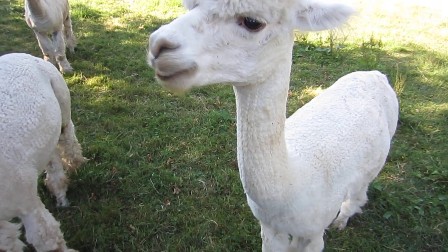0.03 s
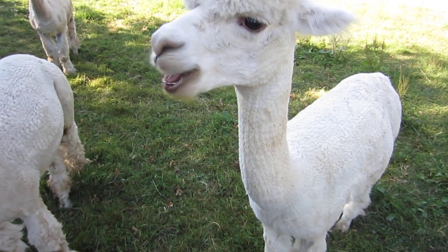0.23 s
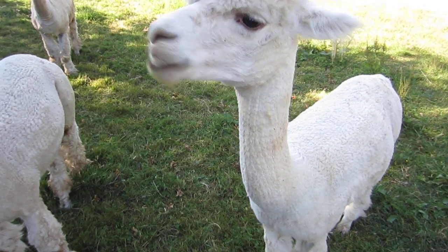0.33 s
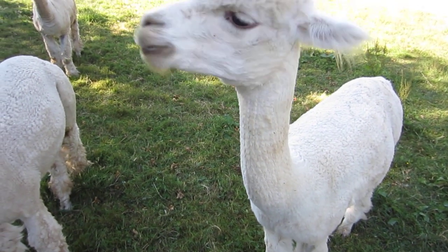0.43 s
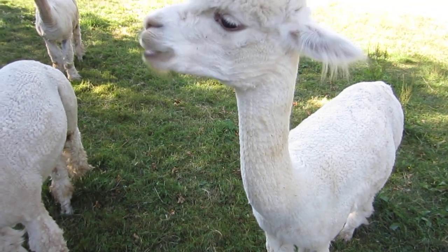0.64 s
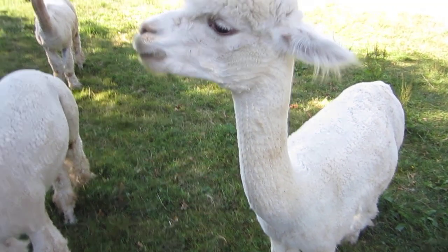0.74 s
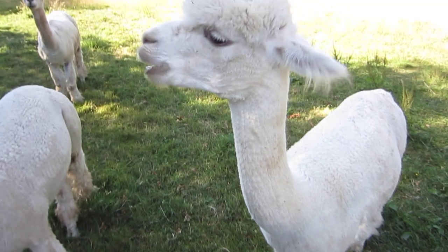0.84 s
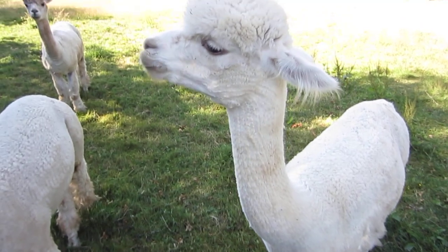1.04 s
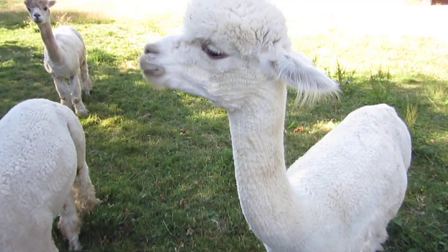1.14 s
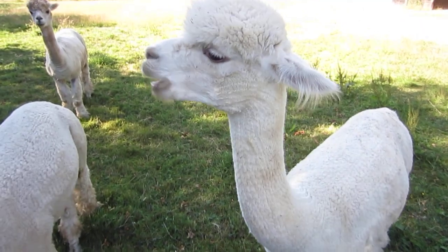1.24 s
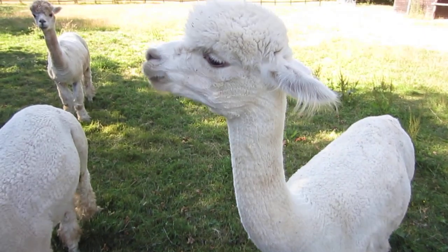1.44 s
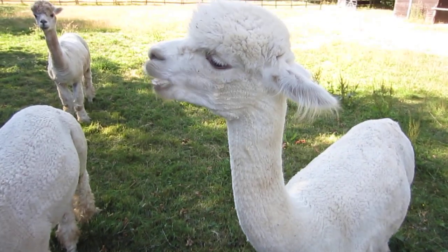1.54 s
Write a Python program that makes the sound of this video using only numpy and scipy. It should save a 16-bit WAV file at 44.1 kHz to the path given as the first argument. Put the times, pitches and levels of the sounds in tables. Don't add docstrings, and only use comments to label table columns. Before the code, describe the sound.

Light breeze thumping bare camera microphones in a grassy paddock, one violent puff, then faint hiss

```python
import sys
import numpy as np
from scipy import signal
from scipy.fft import rfft, irfft, next_fast_len
from scipy.io import wavfile
from scipy.ndimage import uniform_filter1d, map_coordinates

SR = 44100
rng = np.random.default_rng(int(sys.argv[2]) if len(sys.argv) > 2 else 0)


def to_linear_factor(level_db):
    exponent = np.asarray(level_db, float) / 20
    return 10 ** exponent


def digitize_waveform(pressure):
    field = np.atleast_2d(pressure).T
    bounded = np.clip(field, -1, 1)
    quanta = np.round(bounded * 32767).astype(np.int16)
    wavfile.write(sys.argv[1], SR, quanta)


N = 70560

# start_s (lobe centre), peak_db, pitch_hz, push +1 or suck -1
LEFT_EDDIES = [(.006, -36, 90, -1), (.11, -38, 100, 1), (.198, -17.5, 119, -1), (.2135, -16.5, 170, -1),
               (.2208, -7.5, 129.6, 1), (.2385, -18.5, 130, 1), (.2605, -15, 100, 1), (.288, -26, 120, -1),
               (.2915, -11, 140, 1), (.309, -6, 116, -1), (.2957, -21, 180, 1), (.3165, 0.5, 260, -1),
               (.3208, -11, 396, -1), (.3355, -1.5, 193, 1), (.3785, -28, 150, -1), (.3985, -9.5, 130, -1),
               (.419, -21.5, 130, -1), (.762, -23, 70, -1), (.849, -26, 130, -1), (.859, -24, 120, -1),
               (1.0, -28, 130, 1), (1.2935, -19.5, 122, 1), (1.477, -28, 100, 1)]
# start_s (lobe centre), peak_db, pitch_hz, push +1 or suck -1
RIGHT_EDDIES = [(.036, -27.5, 67.6, 1), (.2012, -10, 139, -1), (.2705, -19, 130, 1), (.2795, -7, 150, 1),
                (.283, -10.5, 150, -1), (.296, -15.5, 170, -1), (.312, 0, 90, 1), (.3147, -14.5, 420, -1),
                (.3645, -16, 130, 1), (.379, -10.5, 111, -1), (.3893, -11.5, 211, -1),
                (.425, -24.5, 82.6, -1), (.7225, -22.5, 110, -1), (.735, -22.5, 79, 1),
                (.742, -25.5, 110, -1), (.749, -21, 150, -1), (.745, -12.5, 205, 1), (.753, -17.5, 162, 1),
                (.807, -27, 109, -1), (.841, -21.5, 87, 1), (.851, -17, 86.5, -1), (.858, -22.5, 60, 1),
                (.9865, -33, 118, 1), (1.3075, -10, 159, -1), (1.339, -32, 89, 1), (1.458, -22, 99, -1)]
# start_s (lobe centre), peak_db, pitch_hz, push +1 or suck -1
PUFF = [
    (.30138, -.6, 345, 1),
    (.3023, -11, 620, -1),
    (.30285, -3.2, 225, -1),
    (.3058, -.3, 290, 1),
]
# middle_s, length_s, left_db_rms, right_db_rms
GUSTS = [(.01, 0.019, -35, -34.5), (0.053, 0.027, -49.5, -44), (0.104, 0.043, -42, -58),
         (0.164, 0.034, -61, -38.5), (.21, 0.047, -26, -27), (0.257, 0.025, -34, -39),
         (0.278, .022, -22.5, -22), (0.323, .018, -18.5, -17), (.382, 0.074, -39, -23.5),
         (0.421, 0.038, -28.5, -41), (0.509, 0.076, -46, -43.5), (0.696, .025, -44, -39),
         (0.756, 0.03, -37, -25.5), (0.804, 0.027, -48, -35), (0.862, 0.041, -33, -36.5),
         (0.9, 0.05, -36.5, -45), (0.968, 0.033, -34, -33), (0.999, 0.013, -38, -32),
         (1.059, 0.027, -50, -38), (1.256, 0.046, -41, -44), (1.308, 0.016, -28, -34),
         (1.338, 0.025, -35.5, -36), (1.459, 0.06, -38.5, -38)]
# pitch_hz, level_db_per_hz
BUFFET_SPECTRUM = [(15, -35), (30, -3), (60, 9.5), (110, 4.5), (180, -9.5), (300, -13.5), (480, -19.5),
                   (1500, -120)]
# pitch_hz, level_db_per_hz
FLUTTER_SPECTRUM = [(120, -27.5), (300, 13), (480, -12.5), (700, -8.5), (1000, -52), (2500, -120)]
# start_s, peak_db, pitch_hz, length_cycles, left_over_right_db
TICKS = [
    (.0145, -50, 6600, 8, 3),
    (.0252, -46.5, 9000, 3, 2),
    (.0358, -40.5, 7500, 2, 2.5),
    (.0358, -37.5, 2530, 1.4, 5),
    (.712, -33.5, 647, 3.6, -0.5),
    (1.4415, -30.5, 363, 1.04, -1.5),
]
# pitch_hz, level_db_per_hz
AIR_SPECTRUM = [(60, -1.5), (160, -1.5), (400, -2), (1200, -8.5), (2600, -16.5), (3600, -23.5), (7500, -31),
                (10200, -41.5),
                (11900, -56.5), (13500, -47.5), (15700, -43.5), (15760, -120)]
# pitch_hz, likeness (0 to 1)
ALIKE = [(100, 0.94), (500, 0.9), (1500, 0.86), (6000, 0.88), (14000, .8)]
# pitch_hz, lead_radians
LEAD = [(100, 0), (1000, 0.017), (2700, .13), (5000, -0.075)]

CALM_DB, LUMPS_DB = -52.5, 4
FLUTTER_DB, FLUTTER_GROWS = 15, 2.38
AIR_DB, AIR_LEFT_DB = -43, 1.46
RUSTLE_S, RUSTLE_LENGTH_S, RUSTLE_SHARE, RUSTLE_HZ = 0.463, 0.0095, 1, 4500
DUCK_S, DUCK_DB, DUCK_FALL_S, RECOVER_S = 0.3035, 9, 0.003, 0.22
WIDEN, OVERLOAD = 0.51, 0.985
TIME_S = np.arange(N) / SR


def unit(x):
    return x / np.sqrt(np.mean(x ** 2, -1, keepdims=True) + 1e-20)


def along(points, hz):
    f, v = np.transpose(points)
    return np.interp(np.log(hz + 1), np.log(f + 1), v)


def wobble(rate):
    return map_coordinates(rng.standard_normal(400), [np.arange(N) * rate / SR])


def filtered(x, response):
    m = next_fast_len(N + SR // 2)
    hz = np.fft.rfftfreq(m, 1 / SR)
    return irfft(rfft(x, m) * response(hz), m)[..., :N]


def eddies(rows):
    out = np.zeros(N)
    for middle_s, peak_db, hz, sense in rows:
        u = (np.pi * hz * (TIME_S - middle_s)) ** 2
        out += np.sign(sense) * to_linear_factor(peak_db) * (1 - 2 * u) * np.exp(-u)
    return out


def buffeting():
    power = to_linear_factor(2 * CALM_DB)
    for middle_s, length_s, left_db, right_db in GUSTS:
        swell = np.exp(-(2 * (TIME_S - middle_s) / length_s) ** 4)
        power = power + to_linear_factor([[2 * left_db], [2 * right_db]]) * swell
    rumble = filtered(rng.standard_normal((2, N)), lambda hz: to_linear_factor(along(BUFFET_SPECTRUM, hz)))
    flutter = filtered(rng.standard_normal((2, N)), lambda hz: to_linear_factor(along(FLUTTER_SPECTRUM, hz)))
    lumps = to_linear_factor(LUMPS_DB * np.array([wobble(45.1), wobble(45.53)]))
    low = np.sqrt(power) * unit(rumble * lumps)
    fine = to_linear_factor(FLUTTER_DB) * power ** (FLUTTER_GROWS / 2) * unit(flutter)
    return low + fine


def ticks():
    out = np.zeros((2, N))
    for start_s, peak_db, hz, cycles, pan_db in TICKS:
        turns = np.clip(TIME_S - start_s, 0, None) * hz
        decay = turns * 3 / cycles
        level = to_linear_factor(peak_db + np.array([[pan_db / 2], [-pan_db / 2]]))
        out += level * np.sin(2 * np.pi * turns) * np.e * decay * np.exp(-decay)
    return out


def air():
    z = signal.stft(rng.standard_normal((2, N)), nperseg=512)[2]
    patches = uniform_filter1d(rng.standard_normal(z.shape[1:]), size=6, axis=0)
    patches = uniform_filter1d(patches, size=12, axis=1)
    pair = signal.istft(z * to_linear_factor(0.85 * patches / patches.std()), nperseg=512)[1][:, :N]

    def middle_and_side(hz):
        angle = np.arccos(np.clip(along(ALIKE, hz), -1, 1)) / 2
        return to_linear_factor(along(AIR_SPECTRUM, hz)) * [np.cos(angle), np.sin(angle)]

    mid, side = filtered(pair, middle_and_side)
    both = np.array([mid + side, mid - side])
    both = filtered(both, lambda hz: np.exp(0.5j * along(LEAD, hz) * [[1], [-1]]))
    rustle = RUSTLE_SHARE * np.exp(-((TIME_S - RUSTLE_S) / RUSTLE_LENGTH_S) ** 2)
    both = both + rustle * filtered(both, lambda hz: 1 / (1 + (RUSTLE_HZ / (hz + 1)) ** 4))
    balance = to_linear_factor([[AIR_LEFT_DB / 2], [-AIR_LEFT_DB / 2]])
    return to_linear_factor(AIR_DB + 0.28 * wobble(8.94)) * unit(both) * balance


def scene():
    thumps = np.array([eddies(LEFT_EDDIES + PUFF), eddies(RIGHT_EDDIES)])
    return thumps + buffeting() + ticks() + air()


def low_pass(x):
    return signal.sosfilt(signal.butter(12, 16990, fs=SR, output="sos"), x)


def record(dry):
    since = np.clip(TIME_S - DUCK_S, 0, None)
    fall = 1 - np.exp(-(since / DUCK_FALL_S) ** 2)
    gain = to_linear_factor(-DUCK_DB * fall * np.exp(-since / RECOVER_S))
    ports = np.clip(gain * dry, -OVERLOAD, OVERLOAD)
    wide = ports - WIDEN * ports[::-1]
    return low_pass(np.clip(wide, -1, 1))


dry = scene()
out = record(dry)
digitize_waveform(out)
```